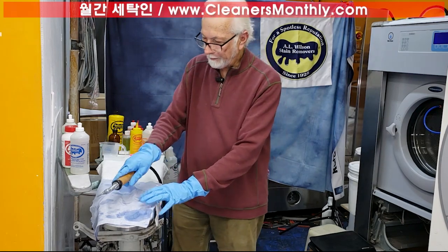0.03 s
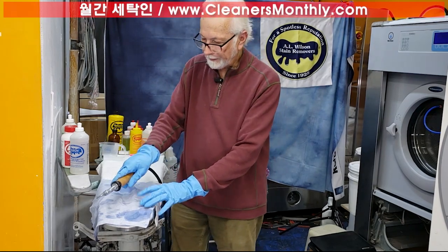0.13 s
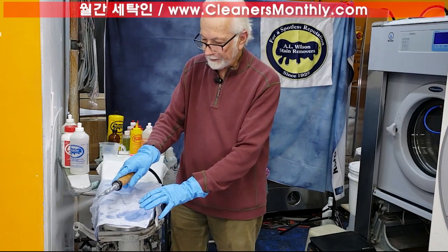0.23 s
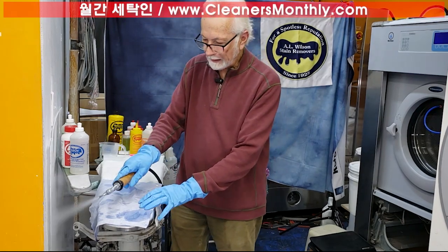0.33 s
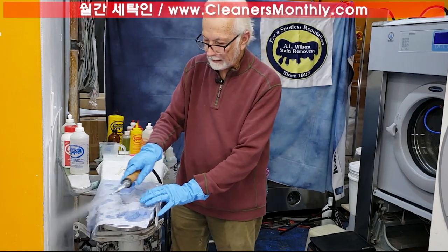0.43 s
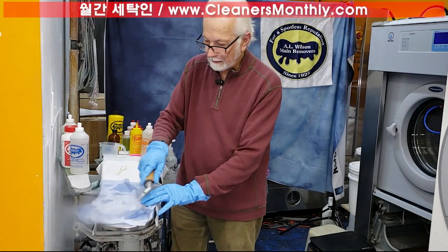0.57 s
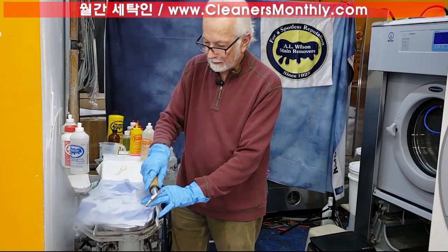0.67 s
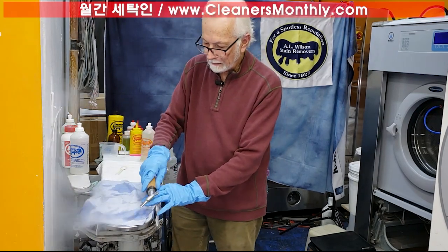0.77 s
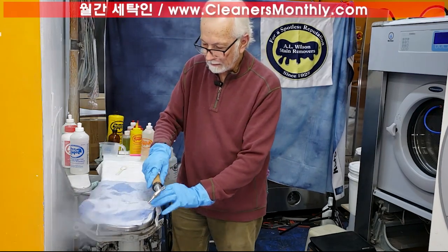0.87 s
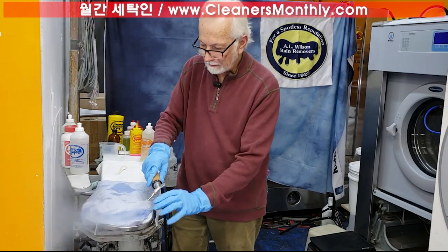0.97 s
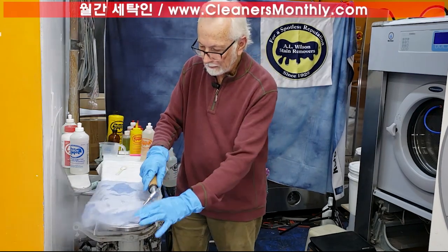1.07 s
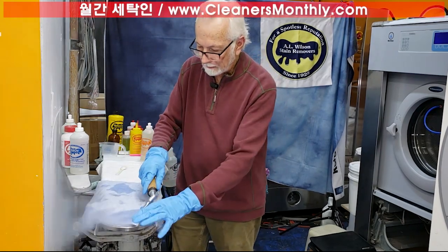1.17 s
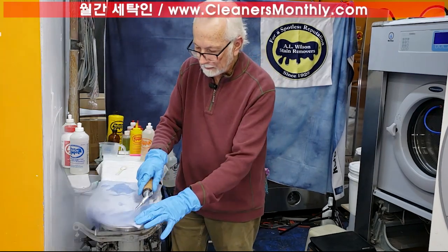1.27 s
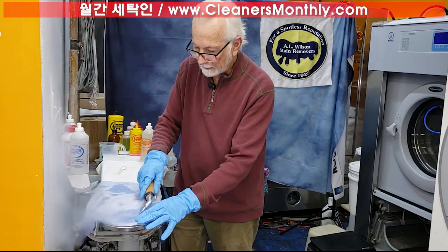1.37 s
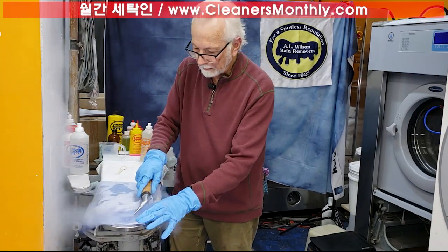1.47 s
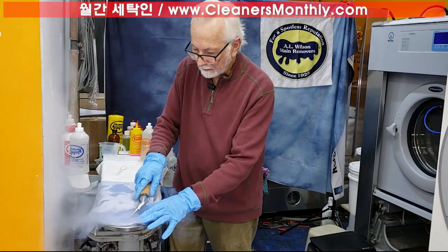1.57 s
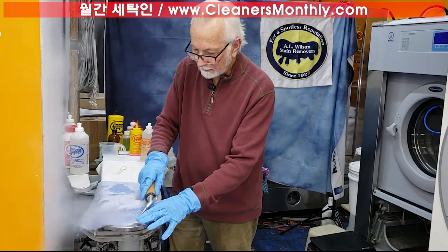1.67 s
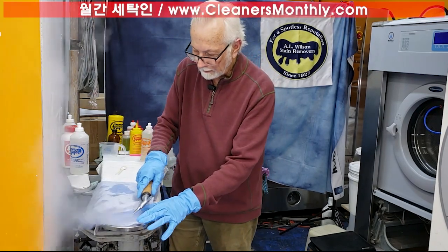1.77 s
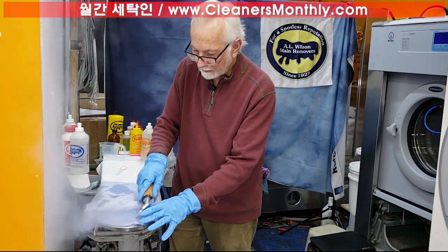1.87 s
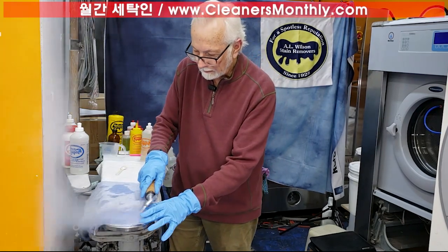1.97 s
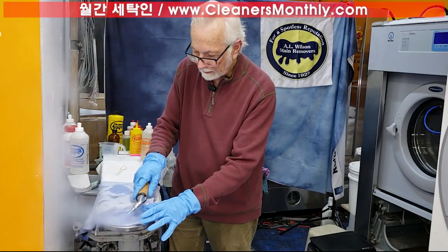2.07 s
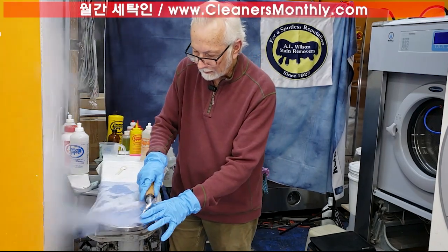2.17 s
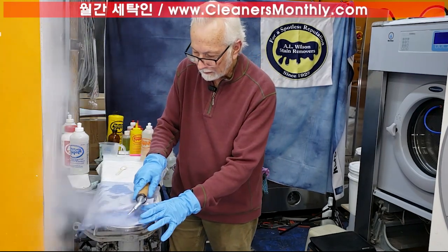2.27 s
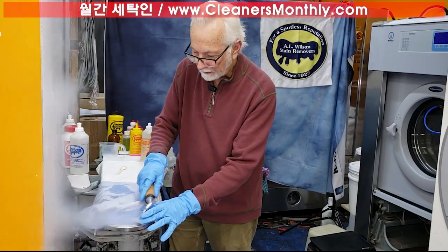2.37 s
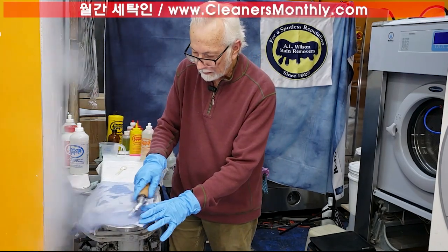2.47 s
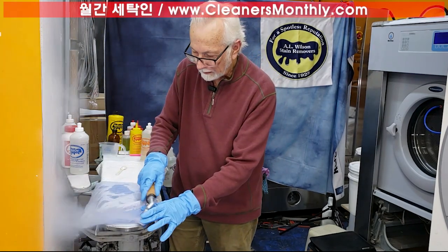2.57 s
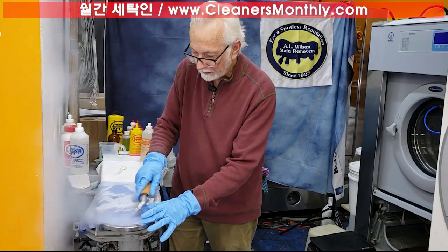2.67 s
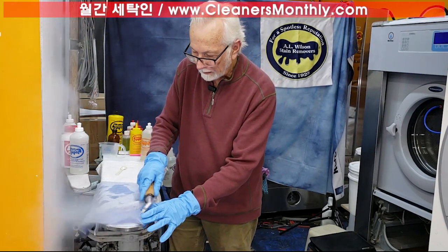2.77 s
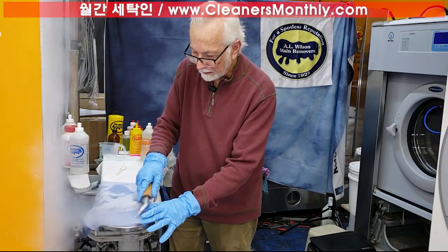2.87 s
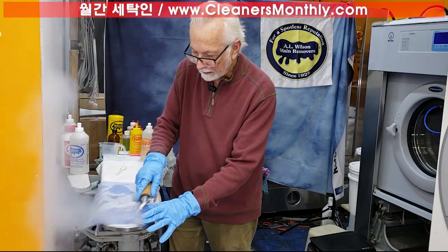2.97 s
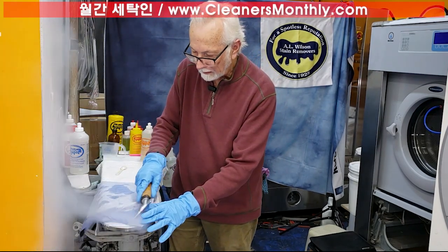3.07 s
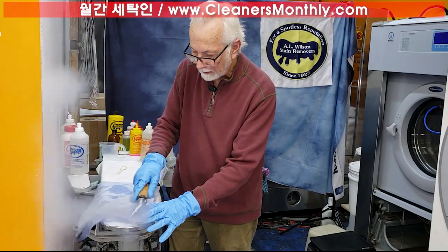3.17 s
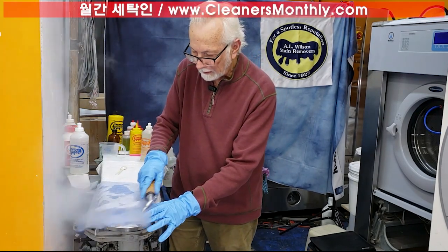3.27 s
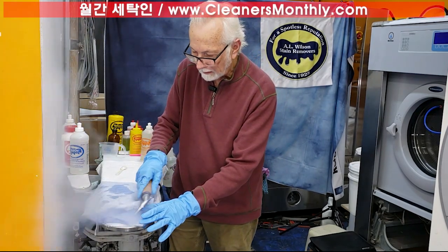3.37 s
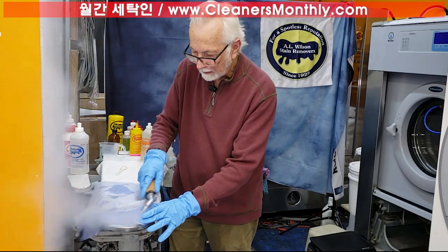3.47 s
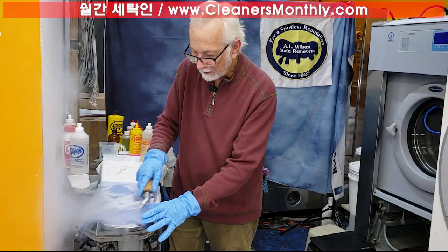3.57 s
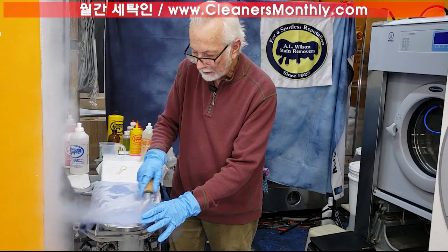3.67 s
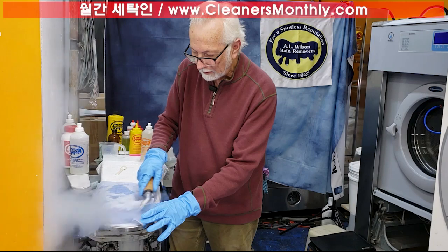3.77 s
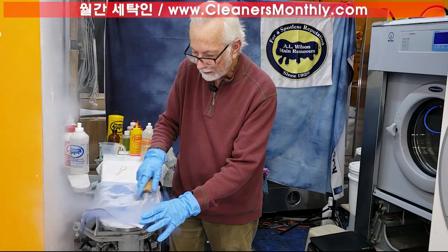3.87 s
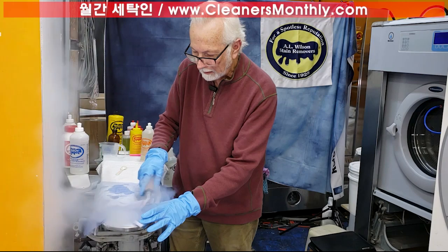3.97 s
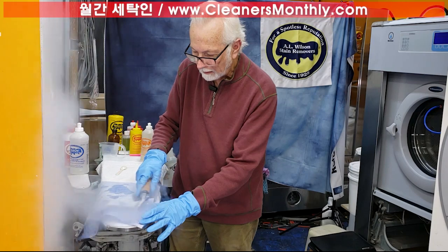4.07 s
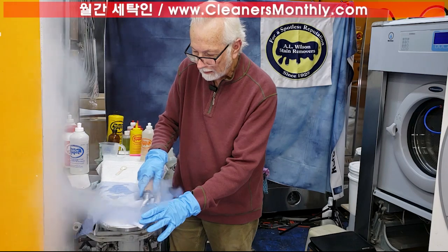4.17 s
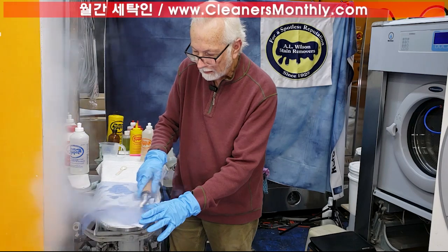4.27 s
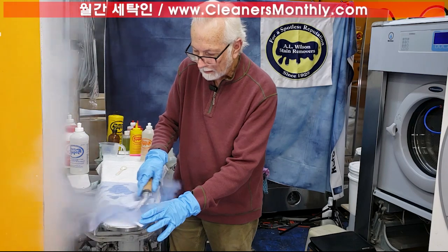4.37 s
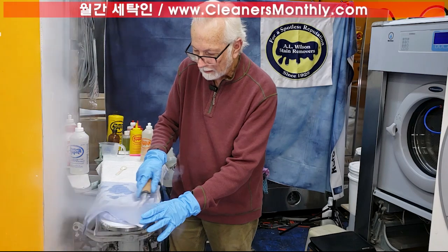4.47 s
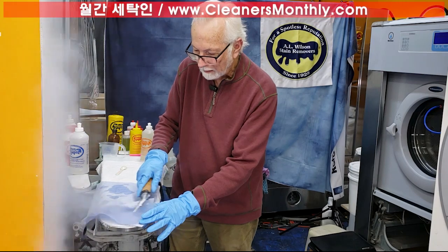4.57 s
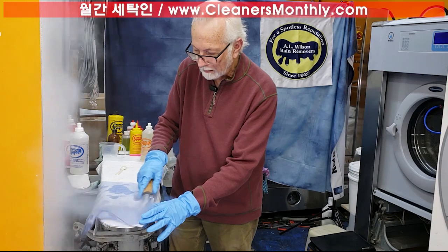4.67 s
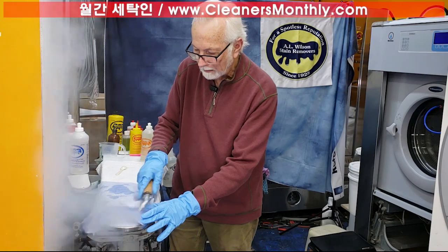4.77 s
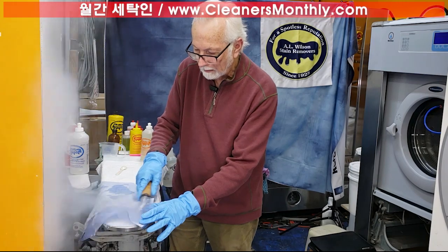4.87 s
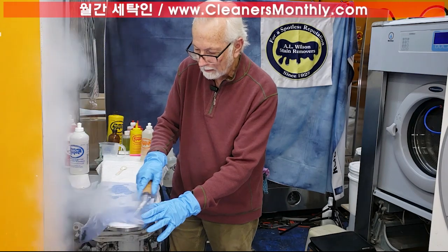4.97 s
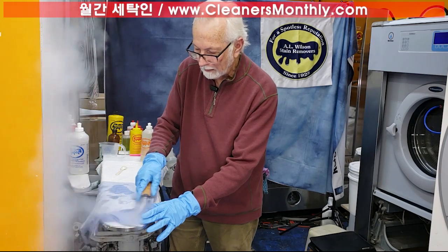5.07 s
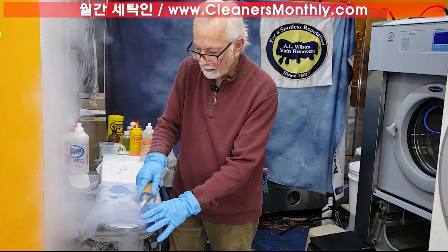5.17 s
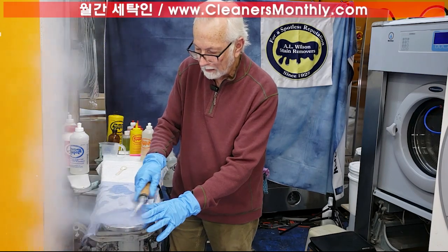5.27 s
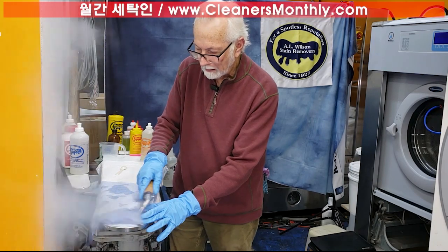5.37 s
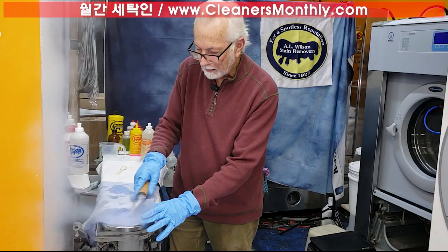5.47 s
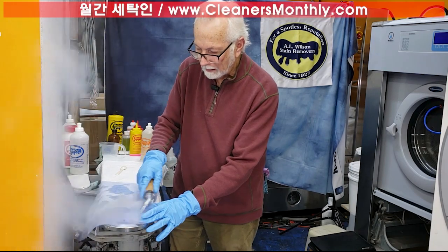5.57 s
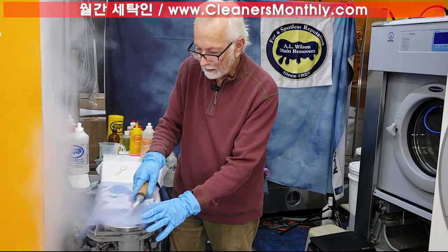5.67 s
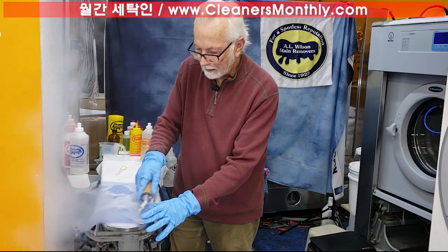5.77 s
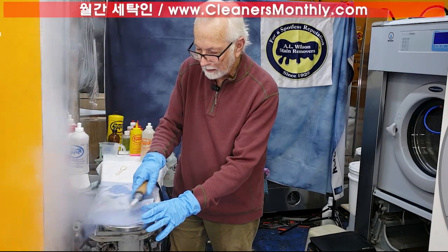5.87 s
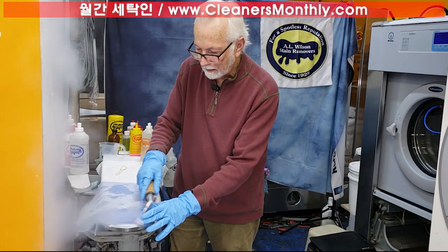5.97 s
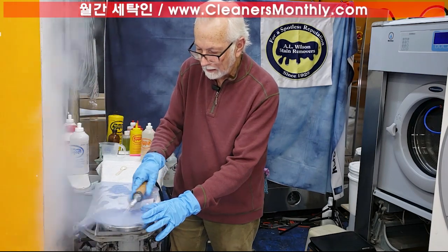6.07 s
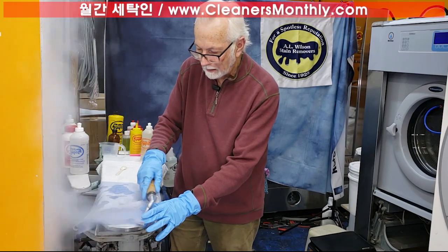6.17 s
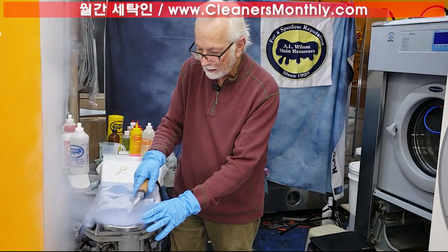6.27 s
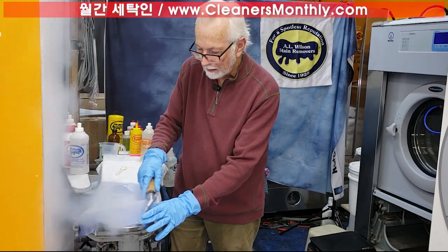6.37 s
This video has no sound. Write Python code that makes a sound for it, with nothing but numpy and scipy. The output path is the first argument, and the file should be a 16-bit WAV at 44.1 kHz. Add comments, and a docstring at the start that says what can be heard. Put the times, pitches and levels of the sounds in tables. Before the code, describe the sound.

After a brief faint hum, a steam gun opens with a spit and hisses loudly through damp cloth, sputtering, dipping midway, then surging back.

```python
"""First a faint low ring over the hum of a dry-cleaning shop, heard on one close microphone.
Then a steam spotting gun opens and blows through a damp garment on a spotting board.
The jet is noise in four broad resonances, with random bursts for its droplets.
At the cloth, noise that swells with each billow makes the roar, and wavering tones make the brief rings.
Gusts of steam rumble on the microphone; the shop is dull noise and a few wavering tones."""
import sys
import numpy as np
from scipy import signal
from scipy.fft import rfft, irfft, next_fast_len
from scipy.io import wavfile

SR = 44100
rng = np.random.default_rng(int(sys.argv[2]) if len(sys.argv) > 2 else 0)


def to_wav(s):
    """Save 16-bit WAV."""
    ch = np.atleast_2d(s).T  # columns
    pcm = np.round(np.clip(ch, -1, 1) * 32767)  # PCM
    wavfile.write(sys.argv[1], SR, pcm.astype(np.int16))


N = 283122
TIME = np.arange(N) / SR

# The valve cracks open, then opens evenly in decibels up to the full flow.
VALVE_OPEN_S, VALVE_FULL_S, VALVE_DB_PER_S = 0.32, 0.93, 55
# Moment and rise time at which the spectra pass from the weak first flow to the full flow.
FULL_FLOW_S, FLOW_RISE_S = 0.63, 0.12
# The nozzle resonance, the lower hump and the cloth answer one after another.
NOZZLE_WAKE_S, LOWER_WAKE_S, WAKE_RISE_S = 0.337, 0.39, 0.047
CLOTH_WAKE_S, CLOTH_RISE_S = 0.535, 0.07
# Humps beside the main one: level against it [dB], and dB per dB of the nozzle's own level.
LOWER_DB, LOWER_FOLLOWS = -2.5, 0.88
UPPER_DB, UPPER_FOLLOWS = -0.34, 0.38

# Jet strength before valve and spit, weaker while the gun is held close to the cloth: t/s, level/dB
JET_STRENGTH = [(0.92, -15), (1.35, -14.0), (1.5, -15), (1.65, -14.5), (2.6, -16), (3.0, -22), (3.3, -27),
                (3.65, -22.5), (3.92, -22.5), (4.12, -26.5), (4.5, -27), (5.0, -24.5), (5.5, -15.5),
                (5.78, -15.5), (6.02, -16.5), (6.2, -15.0), (6.42, -17)]
# Tilt of the gun, heard as nozzle resonance against main hump, before a 0.6 dB trim: t/s, level/dB
GUN_TILT = [(0.55, 1.5), (0.95, 2.5), (1.25, 1.5), (1.55, 0), (2.0, -2.5), (2.45, -4), (2.75, -11.5),
            (3.15, -2.0), (3.45, -0.5), (3.8, -2.0), (4.3, 2), (5.1, -1.5), (5.5, -4.0), (6.42, -3)]
# First spit as the valve cracks: t/s, length/s, added level/dB
FIRST_SPIT = (.355, 0.028, 5.5)
# Flares in the top of the hiss, as the valve cracks and twice later: t/s, length/s, added level/dB
TOP_FLARES = [(.33, 0.054, 3), (3.915, 0.059, 4), (5.745, .09, 4.5)]
# Spectrum of the weak first hiss, narrow peaks with deep valleys between: f/Hz, relative level/dB
FIRST_HISS_SPECTRUM = [(1940, -63), (3300, -35), (3660, -19), (4040, -4), (4570, 8), (4750, 4), (5660, -21),
                       (6280, -16), (6830, -21), (7580, -6), (8520, -23), (9460, -6), (11600, -4),
                       (13400, 4), (15600, -18)]
# Spectrum of the lower and main humps at full flow: f/Hz, relative level/dB
HISS_SPECTRUM = [(3120, -36), (5300, -7), (5590, -3), (5910, -11.5), (7140, -4.5), (8340, -8.5),
                 (9230, -2.5), (9750, -1.5), (11900, -5.5), (15500, -37), (22000, -120)]
# Spectrum of the top of the hiss at full flow: f/Hz, relative level/dB
TOP_HISS_SPECTRUM = [(6710, -25), (11400, 5), (11800, -3), (13400, -0.5), (15300, -13)]


def jet():
    """Wet steam excites the nozzle resonance and three broad humps of hiss, which all sputter together."""
    spit_s, spit_length, spit_db = FIRST_SPIT
    strength_db, = in_time(JET_STRENGTH)
    valve_db = -VALVE_DB_PER_S * np.maximum(VALVE_FULL_S - TIME, 0)
    hiss_db = strength_db + valve_db + spit_db * swell(spit_s, spit_length, 0)

    tilt_db, = in_time(GUN_TILT)
    nozzle = from_db(tilt_db - 0.6) * rise(NOZZLE_WAKE_S, WAKE_RISE_S)
    lower = from_db(LOWER_DB + LOWER_FOLLOWS * tilt_db + 0.5 * drift(2.1))
    lower = lower * rise(LOWER_WAKE_S, WAKE_RISE_S)
    upper = from_db(UPPER_DB + UPPER_FOLLOWS * tilt_db + 0.25 * drift(3.6))
    flare = from_db(sum(db * swell(s, length, 0) for s, length, db in TOP_FLARES))
    spray = from_db(-12) * droplets(per_s=460, spread_db=4.5)

    def steam():
        """Fresh eddies for each register, all carrying the same droplets."""
        return eddies(patchy_db=1.53, rate=9) + spray

    nozzle_part = nozzle * nozzle_tone(steam(), hiss_db)
    lower_hump = lower * blown(steam(), FIRST_HISS_SPECTRUM, HISS_SPECTRUM, 5910, 9170)
    main_hump = blown(steam(), FIRST_HISS_SPECTRUM, HISS_SPECTRUM, 9080, 11100)
    top_hump = upper * flare * blown(steam(), FIRST_HISS_SPECTRUM, TOP_HISS_SPECTRUM, 12630, 17000)
    hiss = nozzle_part + lower_hump + main_hump + top_hump
    # Tilting the gun moves power between the registers but keeps its sum, flares apart.
    hiss = hiss / np.sqrt(1 + nozzle ** 2 + lower ** 2 + upper ** 2)
    sputter_db = 0.75 * drift(28) + 0.55 * drift(120)
    return hiss * from_db(hiss_db + sputter_db)


# Nozzle resonance under a weak jet: f/Hz, relative level/dB
SOFT_NOZZLE_SPECTRUM = [(1710, -54), (2900, -26), (3360, -13), (3760, -7), (4780, 4), (5150, 2.5),
                        (5610, -18), (5900, -11), (7670, -44), (13000, -120)]
# Nozzle resonance under a strong jet: f/Hz, relative level/dB
HARD_NOZZLE_SPECTRUM = [(1710, -61), (2900, -27), (3310, -26), (3710, -14.5), (4810, 2.5), (5040, 3),
                        (5580, -14.5), (5900, -26), (7670, -45), (13000, -120)]
# Jet level where the sharpening begins, and the range over which it completes.
HARD_FROM_DB, HARD_RANGE_DB = -18.5, 4.5
WHISTLE_HZ, WHISTLE_DB = 4895, -5.5


def nozzle_tone(steam, hiss_db):
    """A stronger jet sharpens the nozzle resonance until it half whistles."""
    hard = np.clip((hiss_db - HARD_FROM_DB) / HARD_RANGE_DB, 0, 1)
    whistle = from_db(WHISTLE_DB) * flutter(WHISTLE_HZ, rough=6.1, rate=130)
    sharp = from_db(-1.13) * coloured(steam, HARD_NOZZLE_SPECTRUM, 3020, 5500) + whistle
    soft = blown(steam, FIRST_HISS_SPECTRUM, SOFT_NOZZLE_SPECTRUM, 2440, 5600)
    return (1 - hard) * soft + hard * sharp


def droplets(per_s, spread_db):
    """Condensate bursts at random, each drop a spray whose power fades over a millisecond; rms 1."""
    falls = rng.random(N) < per_s / SR
    sizes = falls * from_db(spread_db * np.minimum(rng.exponential(1, N), 4))
    fade = np.exp(-1000 / SR)
    power = signal.lfilter([1], [1, -fade], sizes ** 2 + 1e-18)
    return rms_one(np.sqrt(power) * rng.standard_normal(N))


# How hard the jet meets the cloth, as rush through the weave before a 0.5 dB trim: t/s, level/dB
CLOTH_RUSH = [(0.6, -35.0), (1.15, -34.5), (1.65, -43), (2.5, -46.5), (3.0, -42.5), (3.4, -42.5),
              (3.7, -45), (4.93, -42.5), (5.03, -39.5), (5.47, -36.5), (5.9, -36.5), (6.2, -36.5),
              (6.42, -38.5)]
# The garment billows under the jet: t/s, length/s, roar level/dB, deep roar level/dB
GARMENT_BILLOWS = [(0.872, 0.12, -29.5, -53), (1.177, 0.14, -28, -41), (1.506, 0.15, -32.5, -54.5),
                   (1.836, 0.14, -38.5, -54), (2.03, 0.071, -41.5, -66), (2.298, 0.05, -39.5, -70),
                   (2.878, 0.024, -42.5, -76), (3.29, 0.049, -40, -53), (3.406, 0.068, -38.5, -63),
                   (4.37, 0.15, -46, -51.5), (4.868, 0.058, -47, -61), (5.02, .035, -39.5, -45),
                   (5.112, .045, -34.5, -35), (5.467, 0.051, -36, -61), (6.064, 0.045, -35.5, -50),
                   (6.29, 0.025, -33.5, -57)]
# Folds caught by the jet resonate, before a 0.5 dB trim: t/s, f/Hz, length/s, level/dB
CLOTH_FOLDS = [(0.754, 660, 0.034, -34), (1.075, 880, 0.024, -27), (1.215, 1080, 0.05, -35),
               (1.44, 663, 0.083, -35.5), (2.792, 1400, .017, -36.5), (2.88, 2350, 0.044, -38),
               (3.432, 1626, 0.026, -39), (3.447, 659, 0.049, -40), (3.962, 2070, 0.01, -38.5),
               (4.409, 610, 0.041, -38.5), (4.684, 396, 0.027, -48.5), (4.88, 639, 0.058, -44.5),
               (5.11, 430, 0.024, -34.5), (5.108, 700, 0.023, -31.5), (5.18, 640, 0.075, -35),
               (5.345, 1440, 0.036, -33)]
# Spectrum of roar and rush in the weak first flow: f/Hz, relative level/dB
FIRST_RUSH_SPECTRUM = [(290, -70), (500, -40), (684, -45), (759, -22), (1060, 2), (1410, 3), (1990, -15),
                       (2570, -2), (2990, -47), (3400, -48), (4420, -78), (7480, -120)]
# Spectrum of the hollow roar: f/Hz, relative level/dB
ROAR_SPECTRUM = [(150, -52), (250, -48), (334, -12), (423, -11.5), (471, -11), (539, -10.5), (596, -2.5),
                 (650, 0), (869, 4), (1030, 0), (1250, -4), (1620, -31), (2750, -120)]
# Spectrum of the rush through the weave at full flow: f/Hz, relative level/dB
RUSH_SPECTRUM = [(620, -28), (1050, -2.5), (1460, -0.5), (1810, -6), (2360, -2), (2970, -13.5), (3300, -18),
                 (4290, -42), (7260, -120)]
# The steady roar grows faster than the rush: levels at the reference rush, and dB per dB of rush.
RUSH_REF_DB, ROAR_DB, DEEP_DB, ROAR_FOLLOWS = -40, -43, -57, 1.6


def cloth():
    """The jet rushes through the weave and flutters the garment: a hollow roar, louder at each billow."""
    rush_db, = in_time(CLOTH_RUSH)
    reached = rise(CLOTH_WAKE_S, CLOTH_RISE_S)
    push = from_db(ROAR_FOLLOWS * (rush_db - RUSH_REF_DB)) * reached
    billow = sum(swell(s, length, db) for s, length, db, _ in GARMENT_BILLOWS)
    deep_billow = sum(swell(s, length, db) for s, length, _, db in GARMENT_BILLOWS)

    steady_level = from_db(ROAR_DB + 1.3 * drift(8)) * push
    steady_eddies = eddies(patchy_db=1.2, rate=15)
    steady_roar = steady_level * blown(steady_eddies, FIRST_RUSH_SPECTRUM, ROAR_SPECTRUM, 690, 1360)
    billow_roar = billow * coloured(eddies(patchy_db=0.8, rate=34), ROAR_SPECTRUM, 480, 1800)

    # Steady and billowing deep roar add as powers.
    deep_level = np.hypot(from_db(DEEP_DB) * push * rise(FULL_FLOW_S, FLOW_RISE_S), deep_billow)
    deep_roar = deep_level * coloured(eddies(patchy_db=2.0, rate=55), ROAR_SPECTRUM, 405, 579, order=8)

    rush_eddies = eddies(patchy_db=1.6, rate=12)
    rush = blown(rush_eddies, FIRST_RUSH_SPECTRUM, RUSH_SPECTRUM, 1211, 3100)
    rush = from_db(rush_db - 0.5) * reached * rush
    # Soft cloth rings raggedly: it wavers at a twelfth of its pitch.
    folds = sum(swell(s, length, db - 0.5) * flutter(hz, rough=2.1, rate=hz / 12)
                for s, hz, length, db in CLOTH_FOLDS)
    return (steady_roar + billow_roar + deep_roar + rush) * from_db(0.9 * drift(32)) + folds


# Steam gusts on the microphone: t/s, length/s, rumble level/dB, deep thump level/dB
STEAM_GUSTS = [(0.956, 0.12, -58.5, -62), (1.162, 0.11, -55, -62), (2.91, 0.046, -64, -62),
               (3.34, 0.023, -64, -80), (5.167, 0.045, -56, -61), (5.387, 0.11, -48, -58),
               (5.65, 0.086, -53.5, -67), (5.914, 0.11, -53, -65), (6.094, 0.048, -62, -72),
               (6.254, 0.28, -58, -66)]
# Spectrum of rumble and thump: f/Hz, relative level/dB
RUMBLE_SPECTRUM = [(15, -47), (25, -17), (48, -8), (81, -18), (135, -1), (204, -11.5), (235, -8), (350, 3),
                   (460, -32), (770, -120)]


def gusts():
    """The steam cloud buffets the close microphone in soft lumps, some with a deep thump."""
    lumps = sum(swell(s, length, db) for s, length, db, _ in STEAM_GUSTS)
    thumps = sum(swell(s, length, db) for s, length, _, db in STEAM_GUSTS)
    rumble = coloured(eddies(patchy_db=1.0, rate=14), RUMBLE_SPECTRUM, 85, 270, order=4)
    thump = coloured(eddies(patchy_db=1.0, rate=10), RUMBLE_SPECTRUM, 38, 109, order=4)
    return lumps * rumble + thumps * thump


# Nearby surfaces, before the treble is dulled: delay t/s, level/dB
SURFACE_ECHOES = [(0.00304, -26), (0.00476, -42), (0.00682, -23), (0.00808, -20), (0.01152, -16.5),
                  (0.01406, -11)]
ECHO_CUT_HZ = 3300


def reflections(x):
    """Board, body and hanging cloth send back dull early echoes that ripple the lower spectrum."""
    def gain_at(hz):
        echoes = sum(from_db(db) * np.exp(-2j * np.pi * hz * s) for s, db in SURFACE_ECHOES)
        return 1 + echoes / (1 + 1j * hz / ECHO_CUT_HZ)
    return filtered(x, gain_at)


# Spectrum of the ventilation: f/Hz, relative level/dB
AIR_SPECTRUM = [(18, -46), (30, -7), (60, -18), (81, -10), (113, -14), (206, -8.5), (231, -8), (301, -6),
                (393, -8), (714, -19), (781, -12.5), (4910, -40), (6000, -64), (7800, -94), (13200, -120)]
# Machines in the shop: f/Hz, level/dB
MACHINE_HUM = [(58, -79.5), (119.5, -76.5), (148, -81), (300, -79), (712, -74.5)]
# A faint low ring before the steam: t/s, f/Hz, length/s, level/dB
FAINT_RING = (.05, 307, .028, -56)


def shop():
    """Behind the gun: ventilation noise, the wavering hum of motors and one faint ring."""
    air = from_db(-64) * coloured(eddies(patchy_db=0.3, rate=6), AIR_SPECTRUM, 46, 5500, order=4)
    hum = sum(from_db(db) * flutter(hz, rough=0.57, rate=3.3) for hz, db in MACHINE_HUM)
    s, hz, length, db = FAINT_RING
    ring = swell(s, length, db) * flutter(hz, rough=0.17, rate=11)
    return air + hum + ring


def blown(source, first, full, low_hz, high_hz):
    """One register of the steam, passing from its first colour to that of the full flow."""
    flow = rise(FULL_FLOW_S, FLOW_RISE_S)
    early = coloured(source, first, low_hz, high_hz)
    return (1 - flow) * early + flow * coloured(source, full, low_hz, high_hz)


def eddies(patchy_db, rate):
    """White turbulence whose strength flickers; rms 1."""
    return rms_one(rng.standard_normal(N) * from_db(patchy_db * drift(rate)))


def flutter(hz, rough, rate):
    """A resonance driven by turbulence: a tone that wavers in strength and phase; rms 1."""
    wobble = 1 + rough * (drift(rate) + 1j * drift(rate))
    return rms_one(np.real(wobble * np.exp(2j * np.pi * hz * TIME)))


def drift(rate):
    """Smooth chance: noise through two low-pass poles at rate Hz; spread 1."""
    # Worked out on every eighth sample, after 4000 steps of settling, then joined by straight lines.
    r = np.exp(-2 * np.pi * rate * 8 / SR)
    slow = signal.lfilter([1], [1, -2 * r, r * r], rng.standard_normal(N // 8 + 4002))[4000:]
    return np.interp(np.arange(N) / 8, np.arange(len(slow)), rms_one(slow))


def coloured(x, spectrum, low_hz, high_hz, order=16):
    """Give x a spectrum, drawn over log frequency, between two steep edges; rms 1."""
    points_hz, points_db = np.transpose(spectrum)

    def gain_at(hz):
        low_edge = 1 + (low_hz / hz) ** (2 * order)
        high_edge = 1 + (hz / high_hz) ** (2 * order)
        level_db = np.interp(np.log(hz), np.log(points_hz), points_db)
        return from_db(level_db) / np.sqrt(low_edge * high_edge)
    return rms_one(filtered(x, gain_at))


def filtered(x, gain_at):
    """Pass x through a gain given as a function of frequency."""
    size = next_fast_len(N + 4096)
    hz = np.maximum(np.fft.rfftfreq(size, 1 / SR), 1)
    return irfft(rfft(x, size) * gain_at(hz), size)[:N]


def swell(s, length, db):
    """A bell-shaped level around one moment, down to 1/e after length seconds."""
    return from_db(db) * np.exp(-np.minimum(((TIME - s) / length) ** 2, 50))


def rise(s, rise_s):
    """A smooth step from 0 to 1 around one moment."""
    return 0.5 + 0.5 * np.tanh((TIME - s) / rise_s)


def in_time(rows):
    """Each column of a curve at every sample."""
    s, *columns = np.transpose(rows)
    return [np.interp(TIME, s, c) for c in columns]


def from_db(db):
    """Decibels to gain."""
    return 10 ** (np.asarray(db) / 20)


def rms_one(x):
    """Scale to unit rms."""
    return x / np.sqrt(np.mean(x ** 2) + 1e-20)


def scene():
    """Gun, cloth and shop reach one close microphone, the same in both channels."""
    steam = from_db(-0.3) * reflections(jet() + cloth()) + gusts()
    mono = rise(VALVE_OPEN_S, WAKE_RISE_S) * steam + shop()
    return np.array([mono, mono])


def record(dry):
    """The top is cut steeply around 15520 Hz."""
    def gain_at(hz):
        return 0.5 - 0.5 * np.tanh((hz - 15520) / 40)
    return np.array([filtered(x, gain_at) for x in dry])


dry = scene()
out = record(dry)
to_wav(out)
```